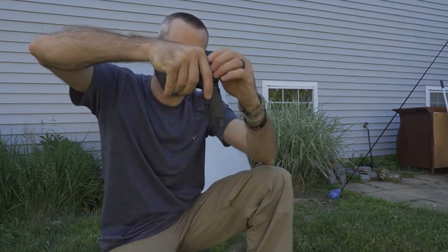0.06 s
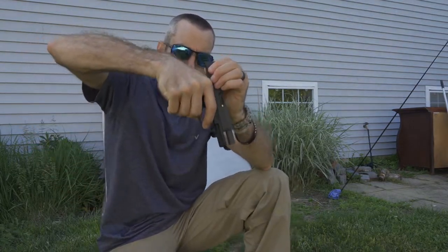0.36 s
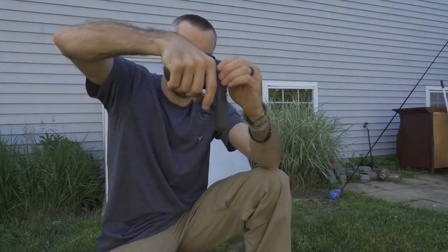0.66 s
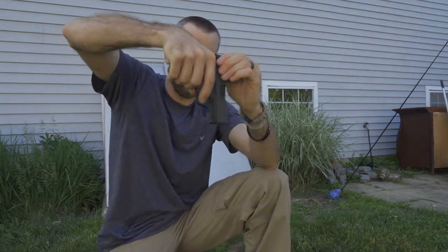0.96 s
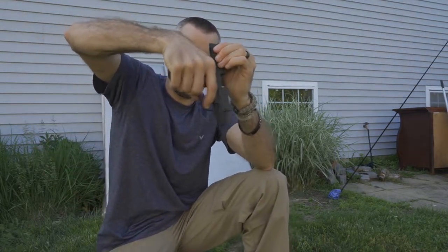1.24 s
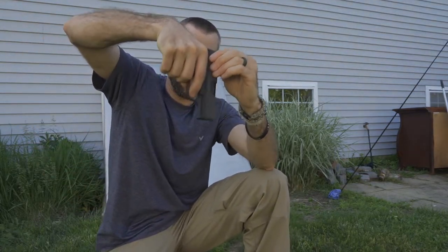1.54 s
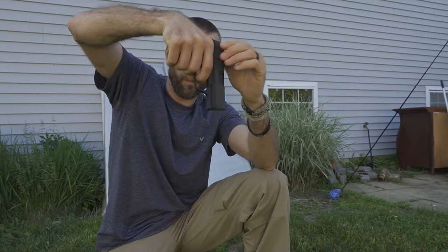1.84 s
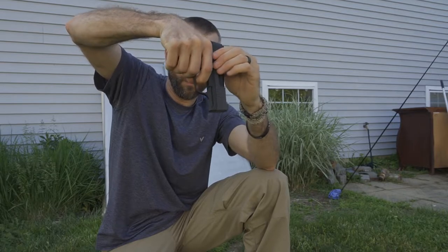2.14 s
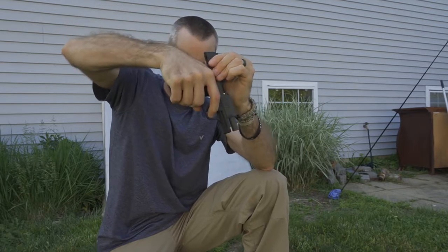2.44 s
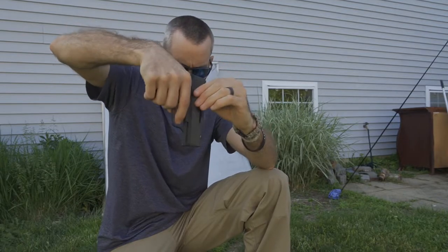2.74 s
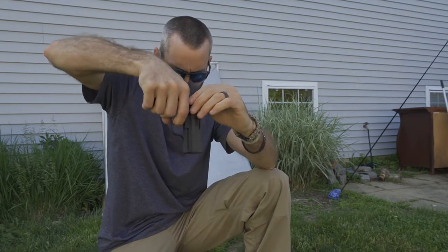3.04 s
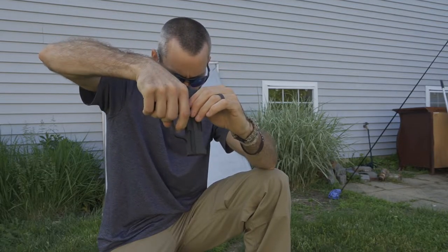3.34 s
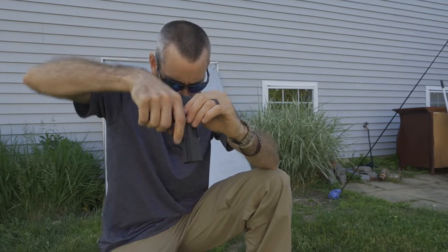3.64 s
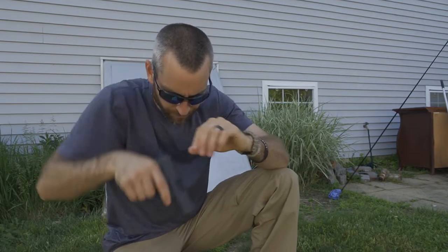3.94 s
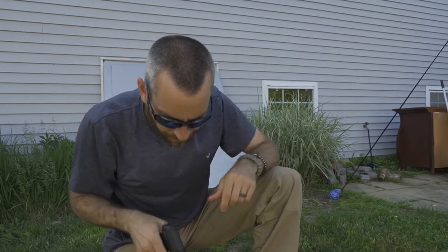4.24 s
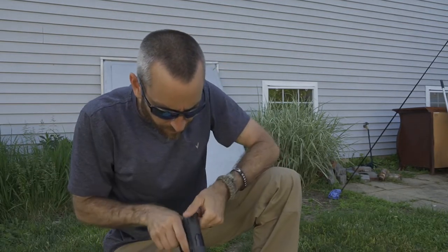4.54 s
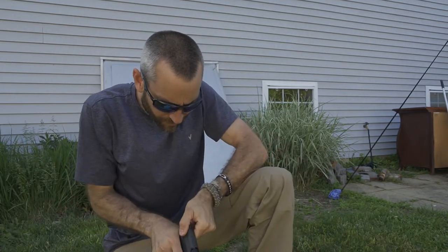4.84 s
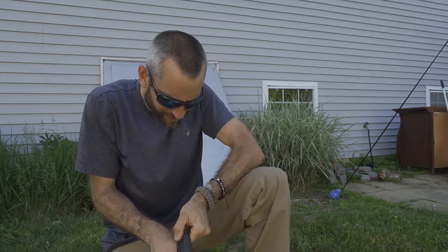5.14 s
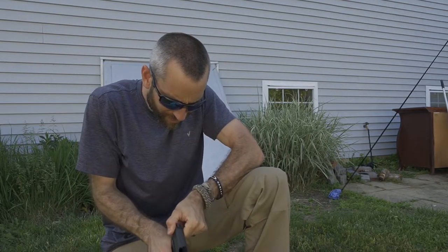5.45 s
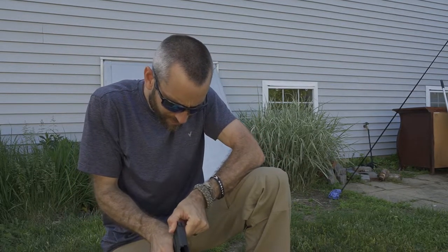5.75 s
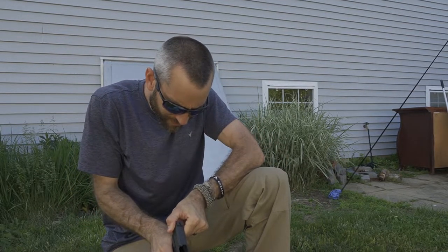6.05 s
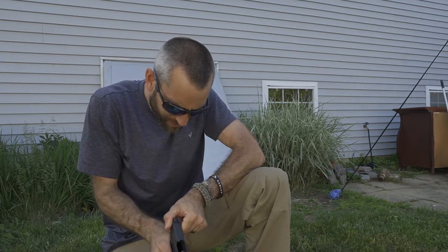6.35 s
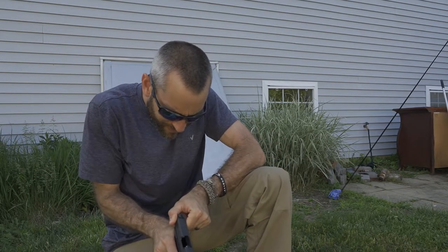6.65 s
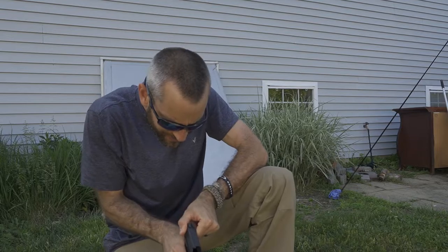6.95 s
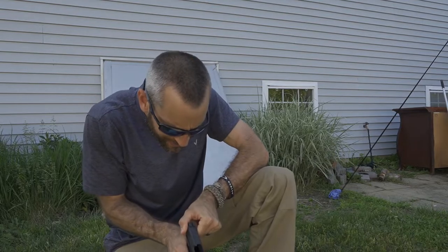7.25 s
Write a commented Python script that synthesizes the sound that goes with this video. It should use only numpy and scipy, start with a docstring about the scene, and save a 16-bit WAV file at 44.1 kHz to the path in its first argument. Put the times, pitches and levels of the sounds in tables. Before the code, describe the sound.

An air pistol's action is worked by hand outdoors, with sharp clicks, scrapes and snaps over low wind and distant traffic.

```python
"""Sharp clicks and scrapes over wind, distant traffic and a machine hum: a man kneeling on a lawn
works the action of an air pistol that keeps misfiring. Parts rub, latch and snap, ringing the hollow
frame, the slide and small steel parts; house, shed and fence throw the snaps back. Birds call faintly.
His clothes swish as he lowers his arms, then he works the action once more.
A limiter ducks after each hard snap."""
import sys
import numpy as np
from scipy import signal
from scipy.fft import rfft, irfft, next_fast_len
from scipy.io import wavfile
from scipy.ndimage import uniform_filter1d

SR = 44100
rng = np.random.default_rng(int(sys.argv[2]) if len(sys.argv) > 2 else 0)


def transcribe(signal):
    """Save signal, clipped to [-1, 1], as a 16-bit WAV file at the path in sys.argv[1]."""
    frames = np.atleast_2d(signal).T
    limited = np.clip(frames, -1, 1)
    pcm = np.round(limited * 32767).astype(np.int16)
    wavfile.write(sys.argv[1], SR, pcm)


N = 321612
TIME = np.arange(N) / SR
CONTACT_SAMPLES = .005 * SR   # contact levels refer to a 5 ms window


def from_db(db):
    return 10 ** (np.asarray(db) / 20)


def unit_energy(x):
    return x / np.sqrt(np.sum(x ** 2) + 1e-20)


def at_hz(rows, hz):
    """Table columns interpolated on a log-frequency axis."""
    points_hz, *columns = np.transpose(rows)
    return [np.interp(np.log(hz), np.log(points_hz), column) for column in columns]


def add(out, start_s, sound):
    start = int(round(start_s * SR))
    out[start:start + len(sound)] += sound[:N - start]


def butter(x, hz, kind, order=2):
    return signal.sosfilt(signal.butter(order, hz, kind, fs=SR, output="sos"), x)


def drift(rate_hz):
    """Slow random curve, spread about 1."""
    knots = rng.standard_normal(16384)
    return np.interp(TIME * rate_hz, np.arange(len(knots)), knots)


def coloured_noise(spectrum):
    """Unit-rms noise with the given spectral shape."""
    size = next_fast_len(N)
    level_db, = at_hz(spectrum, np.arange(size // 2 + 1) * SR / size + 1e-3)
    noise = irfft(rfft(rng.standard_normal(size)) * from_db(level_db), size)[:N]
    return noise / np.sqrt(np.mean(noise ** 2))


def traffic_and_wind():
    """Distant traffic above a gusty wind rumble that slowly freshens."""
    # Outdoor noise. Each row: frequency in Hz, relative density in dB.
    spectrum = [(12, -32), (20, 4), (38, 0.5), (123, -1), (146, -8), (193, -7.5), (262, -14), (293, -11.5),
                (558, -26.5), (923, -25), (1960, -34.5), (3160, -39.5), (3440, -33), (5230, -54),
                (16000, -63)]
    # Its slow swell. Each row: time in seconds, gain in dB.
    swell = [(0, -36), (1.5, -37.5), (3, -36.5), (4.2, -35), (5.2, -37), (6, -35), (7.29, -37)]
    air = butter(coloured_noise(spectrum), 29.88, "high")
    traffic = butter(air, 70, "high", order=3)
    gust_db = np.linspace(-5, 1.5, N) + 2 * drift(9.4)
    wind = butter(air, 62, "low", order=3) * from_db(gust_db)
    return (traffic + wind) * from_db(np.interp(TIME, *np.transpose(swell)))


def machine_hum(waver_db=2.5, wander_hz=2.246):
    """A machine next door; each partial wavers in pitch and level."""
    # Hum partials. Each row: frequency in Hz, rms level in dB.
    partials = [(118.6, -45), (296, -57.5), (413, -61), (3365, -70.5)]
    out = np.zeros(N)
    for hz, db in partials:
        phase = 2 * np.pi * np.cumsum(hz + wander_hz * drift(8.2)) / SR
        out += np.sqrt(2) * np.sin(phase) * from_db(db + waver_db * drift(4))
    return out


def clothes(raised_db=-59.5, resting_db=-62.5, lowering_s=(3.7, 4.7)):
    """Cloth stirs, more while the arms are raised, and swishes as they move."""
    # Cloth friction. Each row: frequency in Hz, relative density in dB.
    spectrum = [(200, -5.5), (600, -4), (1500, 3.5), (3500, 4.5), (6000, -6), (10000, -11), (15000, -10.5)]
    # Arms drop, then settle. Each row: centre in seconds, half length in seconds, level in dB.
    arm_moves = [(4.078, 0.17, -47.5), (4.603, 0.3, -55)]
    power = from_db(np.interp(TIME, lowering_s, [raised_db, resting_db])) ** 2
    for centre_s, half_s, db in arm_moves:
        swish = from_db(db) * np.exp(-((TIME - centre_s) / half_s) ** 2)
        power += swish ** 2
    return coloured_noise(spectrum) * np.sqrt(power)


def ring(force, modes, crack_db):
    """Damped modes plus the bare crack; mode gains vary with the place of contact."""
    out = 0
    for k, (hz, db, t60_s) in enumerate(modes):
        radius, angle = from_db(-60 / (t60_s * SR)), 2 * np.pi * hz / SR
        gain = from_db(db + 1.5 * rng.standard_normal()) * (-1) ** k
        poles = [1, -2 * radius * np.cos(angle), radius ** 2]
        out += gain * signal.lfilter([np.sin(angle), 0], poles, force)
    return unit_energy(out) + from_db(crack_db) * unit_energy(force)


def frame_ring(force, *extra_modes):
    """The hollow frame radiates little below its lowest mode."""
    # Frame modes. Each row: frequency in Hz, relative gain in dB, T60 in seconds.
    modes = [(1308, 1, 0.0083), (1607, -3.5, 0.016), (1952, -12.5, 0.03)]
    sound = ring(force, [*modes, *extra_modes], crack_db=2)
    sound = butter(sound, 1198, "high", order=3)
    return unit_energy(butter(sound, 1500, "low"))


def slide_ring(force, *extra_modes):
    """The slide gives the hard midrange of a click."""
    # Slide modes. Each row: frequency in Hz, relative gain in dB, T60 in seconds.
    modes = [(2100, 6, 0.0027), (2495, 2, 0.016), (2916, -5.5, 0.01035), (3410, -6.5, 0.022),
             (3578, -6.5, 0.025), (3890, 5.5, 0.0068)]
    sound = ring(force, [*modes, *extra_modes], crack_db=-6.5)
    return unit_energy(butter(sound, [1850, 4500], "band", order=3))


def steel_ring(force):
    """Small steel parts give a bright, dry crack with little ring."""
    # Steel modes. Each row: frequency in Hz, relative gain in dB, T60 in seconds.
    modes = [(5770, 1.5, 0.0035), (6270, 1, 0.013), (7750, -2, 0.00509), (9580, -8, 0.014),
             (15630, 16, 0.00057)]
    sound = butter(ring(force, modes, crack_db=5), 4400, "high", order=3)
    return unit_energy(butter(sound, 8500, "low", order=1))


def scrape(out, start_s, end_s, start_db, end_db, rasp_db, grit_hz=600):
    """Sliding parts drive the modes: a dense rub when pressed hard, loose ticks when held lightly."""
    t = np.arange(8192) / SR
    length_s = end_s - start_s
    gate = (t < length_s) * (1 - np.exp(-t / .0016))
    pressure = gate * from_db(np.interp(t, [0, length_s], [start_db, end_db]))
    grit_depth_db = np.interp(end_db, [-40, -26], [9, 3])
    grit = np.interp(t * grit_hz, np.arange(256), np.minimum(rng.standard_normal(256), 1.8))
    force = rng.standard_normal(len(t)) * from_db(grit_depth_db * grit) * pressure
    frame = from_db(-4.5) * frame_ring(force)
    slide = from_db(.5) * slide_ring(force)
    steel = from_db(rasp_db - 12) * butter(steel_ring(force), 9500, "low")
    add(out, start_s, (frame + slide + steel) * np.sqrt(np.sum(pressure ** 2)))


def fumbles(fade_db=6):
    """Fingers shift on the pistol in short, fading scrapes."""
    # Grip shifts. Each row: start in seconds, end in seconds, initial level in dB.
    shifts = [(0.146, 0.294, -47.5), (1.734, 1.8, -40.5), (1.967, 2.028, -42), (2.208, 2.35, -39.5),
              (2.926, 2.958, -35.5), (3.138, 3.249, -47), (3.341, 3.463, -49.5), (3.55, 3.588, -44)]
    out = np.zeros(N)
    for start_s, end_s, db in shifts:
        scrape(out, start_s, end_s, db, db - fade_db, rasp_db=3.5)
    return out


def graze(out, end_s, db, rise_s=.00445):
    """Parts brush each other just before they meet."""
    t = np.arange(1024) / SR
    force = rng.standard_normal(len(t)) * np.exp((t - t[-1]) / rise_s)
    sound = unit_energy(frame_ring(force) + slide_ring(force))
    add(out, end_s - t[-1], from_db(db) * sound * np.sqrt(CONTACT_SAMPLES))


def chatter(t, rise_s, decay_s):
    """A volley of tiny bounces, spectrally flat, dying within milliseconds."""
    envelope = (1 - np.exp(-t / rise_s)) * np.exp(-t / decay_s)
    force = rng.standard_normal(len(t))
    for _ in range(3):   # shape, then whiten
        spectrum = rfft(force * envelope)
        force = irfft(spectrum / (np.abs(spectrum) + 1e-12), len(t))
    return force * np.sqrt(envelope)


def snap(out, at_s, frame_db, slide_db, steel_db, frame_hz, slide_hz):
    """Parts graze, then hit: frame, slide and steel ring over a dull thud; pins and springs rattle."""
    graze(out, at_s, min(max(frame_db, slide_db) - 13, -32))
    t = np.arange(2048) / SR
    push = chatter(t, rise_s=.00021, decay_s=.0019)
    rattle = unit_energy(rng.standard_normal(len(t)) * np.exp(-t / .0042))
    tick = unit_energy(chatter(t, rise_s=.0002, decay_s=.0035))
    frame = from_db(frame_db + 1.84) * frame_ring(push, (frame_hz, 7, .015))
    slide = from_db(slide_db + 3.7) * slide_ring(push, (slide_hz, 6, .011))
    steel = from_db(steel_db - .5) * steel_ring(tick + from_db(-2) * rattle)
    thud_boost_db = np.interp(slide_db, [-8, 0], [0, 3])   # the hardest snaps carry a stronger low thud
    thud_db = (frame_db + slide_db) / 2 - 18 + thud_boost_db
    thud = from_db(thud_db) * unit_energy(butter(push, [450, 1100], "band"))
    add(out, at_s, (frame + slide + steel + thud) * np.sqrt(CONTACT_SAMPLES))


def clicks():
    """Parts click under the fingers, each at its own pitch."""
    # Single contacts. Each row: time in seconds, frame level in dB, slide level in dB.
    contacts = [(0.1987, -39, -52), (0.522, -38.5, -42), (1.767, -29.5, -58), (1.9775, -27.5, -27),
                (2.0157, -19.5, -25), (2.025, -28.5, -29), (2.084, -29, -33.5), (2.1007, -20.5, -24),
                (2.2526, -20.5, -24), (2.2606, -22, -21), (2.3177, -27.5, -31.5), (2.3658, -17.5, -5),
                (2.9454, -22, -40), (3.115, -33, -30.5), (3.1583, -18.5, -30), (3.17, -26, -27),
                (3.2123, -31, -35), (3.232, -22, -26.5), (3.238, -25, -36), (3.2553, -69, -34.5),
                (3.3405, -37.5, -39.5), (3.37, -28.5, -35), (3.3797, -24, -37), (3.434, -28.5, -27.5),
                (3.4577, -63, -35.5), (3.5353, -40.5, -38.5), (3.5797, -20.5, -26.5), (3.5979, -30, -28.5),
                (4.6642, -36, -32), (4.7633, -42.5, -45.5), (4.8128, -52, -41.5), (4.95, -39.5, -30)]
    out = np.zeros(N)
    for at_s, frame_db, slide_db in contacts:
        frame_hz = 1353 * (1 + .02 * rng.standard_normal())
        slide_hz = rng.uniform(2350, 3776)
        steel_db = (frame_db + slide_db) / 2 - 5
        snap(out, at_s, frame_db, slide_db, steel_db, frame_hz, slide_hz)
    return out


def slide_returns(fade_db=6.5):
    """The slide runs forward with a bright rasp, bumps on the way and snaps shut."""
    # Forward strokes. Each row: shut time in seconds, frame and slide levels in dB, frame and slide
    # rings in Hz, run length in seconds, run level in dB, extra crack in dB.
    strokes = [(0.3077, -9.5, -17, 1570, 2332, .019, -21.5, -3),
               (0.758, 1, -11.5, 1626, 2540, .0405, -15, 0.5),
               (1.2735, -4, -7.5, 1645, 2570, 0.04, -14.5, -1.5),
               (2.3782, -0.5, -6.5, 1677, 2620, .0207, -24, 2),
               (4.9807, -25, -15, 1353, 2515, .0156, -22, 3.5)]
    # Bumps along a run. Each row: delay in seconds, level in dB re the run.
    bumps = [(0, -4), (.0195, -3), (.03, -8)]
    out = np.zeros(N)
    for shut_s, frame_db, slide_db, frame_hz, slide_hz, run_s, run_db, crack_db in strokes:
        start_s, rub_db = shut_s - run_s, run_db - 6.5
        scrape(out, start_s, shut_s, rub_db, rub_db - fade_db, rasp_db=9 + crack_db)
        for delay_s, bump_db in bumps:
            if delay_s < run_s:
                db = run_db + bump_db
                snap(out, start_s + delay_s, db - 3.5, db, db + crack_db, frame_hz=1600, slide_hz=3310)
        snap(out, shut_s, frame_db, slide_db, slide_db - 6 + crack_db, frame_hz, slide_hz)
    return out


def slide_pulls(rub_s=.031, overrun_s=.0047, touch_lead_s=.0072):
    """Drawn back, the slide rubs ever harder, trips its catch, touches lightly and hits the stop."""
    # Back strokes. Each row: stop time in seconds, stop level in dB, frame and slide rings in Hz,
    # catch lead in seconds, catch level in dB.
    strokes = [(0.6279, -1.5, 1576, 3770, .0587, -18), (1.006, -0.5, 1350, 4000, 0.036, -12),
               (1.5244, -2, 1546, 3755, .0321, -16.5), (2.6258, -1.5, 1304, 3060, .0419, -14.5)]
    out = np.zeros(N)
    for stop_s, stop_db, frame_hz, slide_hz, lead_s, catch_db in strokes:
        catch_s, touch_s = stop_s - lead_s, stop_s - touch_lead_s
        scrape(out, catch_s - rub_s, catch_s + overrun_s, start_db=-34, end_db=-19, rasp_db=.5)
        snap(out, catch_s, catch_db - 5, catch_db, catch_db - 8.5, frame_hz=1623.5, slide_hz=3103.5)
        snap(out, touch_s, frame_db=-20, slide_db=-26, steel_db=-41, frame_hz=1552.5, slide_hz=2751)
        snap(out, stop_s, stop_db + .48, stop_db, stop_db - 2, frame_hz, slide_hz)
    return out


def misfires():
    """The hammer falls without a shot."""
    # Hammer blows. Each row: time in seconds, level in dB, frame and slide rings in Hz.
    blows = [(1.8033, -6.5, 1488, 3420), (2.9741, -6, 1395, 2640)]
    out = np.zeros(N)
    for at_s, db, frame_hz, slide_hz in blows:
        snap(out, at_s, db - .71, db, db - 2.5, frame_hz, slide_hz)
    return out


def birds(blur_hz=150):
    """Far-off calls: thin glides blurred by pitch jitter."""
    # Calls. Each row: start and length in seconds, start and end pitch in Hz, peak level in dB.
    calls = [(2.11, 0.12, 6230, 5900, -62), (6.29, 0.11, 3950, 4450, -59), (6.87, 0.091, 4100, 3900, -58.5)]
    out = np.zeros(N)
    for start_s, length_s, start_hz, end_hz, db in calls:
        progress = np.clip((TIME - start_s) / length_s, 0, 1)
        hz = start_hz + (end_hz - start_hz) * progress + blur_hz * drift(1200)
        out += from_db(db) * np.sin(np.pi * progress) * np.sin(2 * np.pi * np.cumsum(hz) / SR)
    return out


def yard(x, tail_db=-22.5, smear_s=.0055, echo_top_hz=5000):
    """Smeared wall echoes, then lumpy scatter from siding and shrubs that dies band by band."""
    # Reflections off house, shed and fence. Each row: delay in seconds, gain in dB.
    walls = [(0.0178, -20), (.028, -22), (.049, -22), (.0655, -31.5), (.096, -36)]
    # Scattered tail. Each row: frequency in Hz, relative level in dB, T60 in seconds.
    scatter = [(486.6, -20.5, 0.57), (1396, -6, 0.41), (3600, -0.5, 0.48), (7740, 6.5, 0.19),
               (15350, -7.5, 0.32)]
    t = np.arange(SR * 3 // 4) / SR
    echoes, tail = np.zeros((2, len(t)))
    for delay_s, db in walls:
        echo = unit_energy(chatter(t[:1024], rise_s=.00016, decay_s=smear_s))
        add(echoes, delay_s, from_db(db) * echo)
    edges_hz = np.geomspace(350, 19000, 8)
    for low_hz, high_hz in zip(edges_hz, edges_hz[1:]):
        db, t60_s = at_hz(scatter, np.sqrt(low_hz * high_hz))
        noise = butter(rng.standard_normal(len(t)), [low_hz, high_hz], "band")
        tail += noise * from_db(db - 60 * t / t60_s)
    build_up = np.interp(t, [0, .016, .02], [.2, .3, 1])   # only the lawn scatters before the first wall
    lumps = from_db(1.5 * drift(220)[:len(t)])
    tail = from_db(tail_db) * unit_energy(tail * build_up * lumps)
    response = butter(echoes, echo_top_hz, "low", order=1) + tail
    return signal.oaconvolve(x, response)[:N]


def limiter(x, threshold_db=-5.5, release_db_per_s=115):
    """Gain drops at once on a loud snap, then recovers at a steady rate."""
    power = np.maximum(uniform_filter1d(x ** 2, size=44), 1e-12)
    over_db = np.maximum(10 * np.log10(power) - threshold_db, 0)
    release_db = release_db_per_s * TIME
    held_db = np.maximum.accumulate(over_db + release_db) - release_db
    return x * from_db(-uniform_filter1d(held_db, size=22))


def scene():
    """Mono mix; only the pistol echoes in the yard."""
    background = traffic_and_wind() + machine_hum() + clothes()
    pistol = fumbles() + clicks() + slide_returns() + slide_pulls() + misfires()
    return (background + pistol + birds() + yard(pistol))[None, :]


def record(dry, cutoff_hz=15650):
    """Limiter, soft clip at full scale, steep low-pass."""
    limited = limiter(dry[0])
    rounded = limited / (1 + limited ** 6) ** (1 / 6)
    low_pass = signal.ellip(10, .1, 80, cutoff_hz, fs=SR, output="sos")
    return signal.sosfilt(low_pass, rounded)[None, :]


dry = scene()
out = record(dry)
transcribe(out)
```